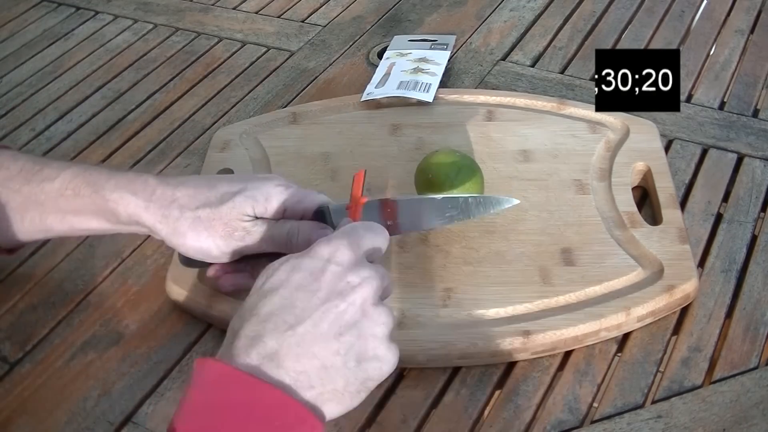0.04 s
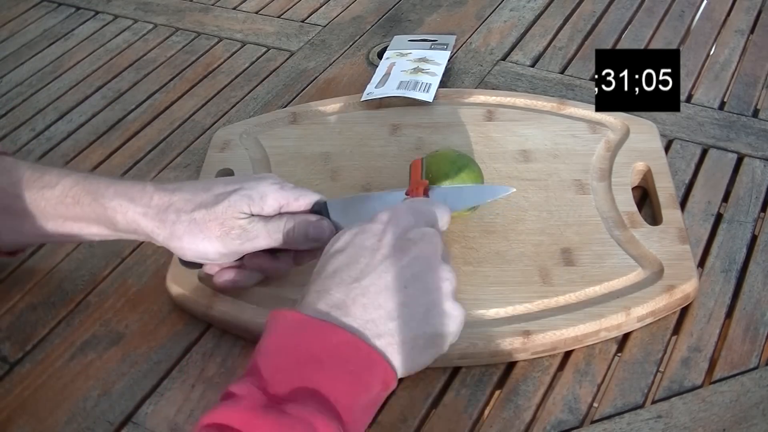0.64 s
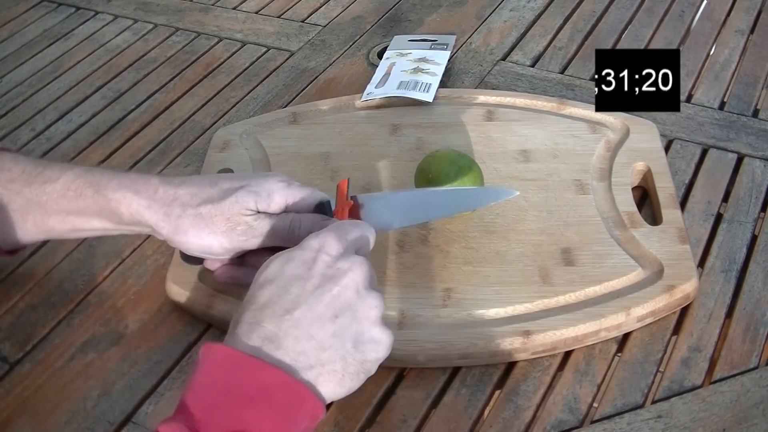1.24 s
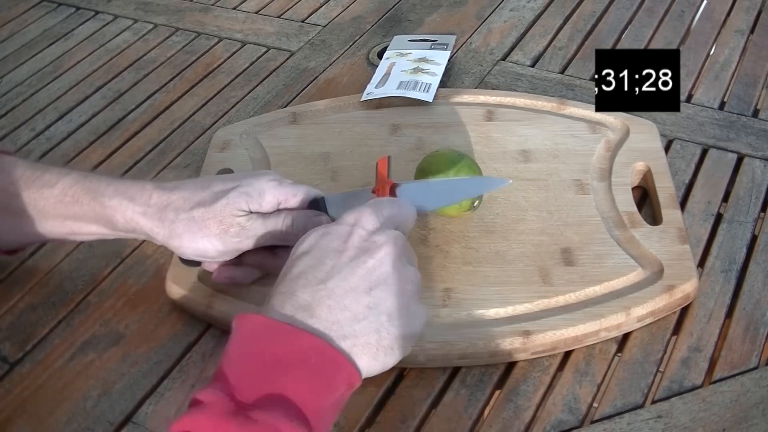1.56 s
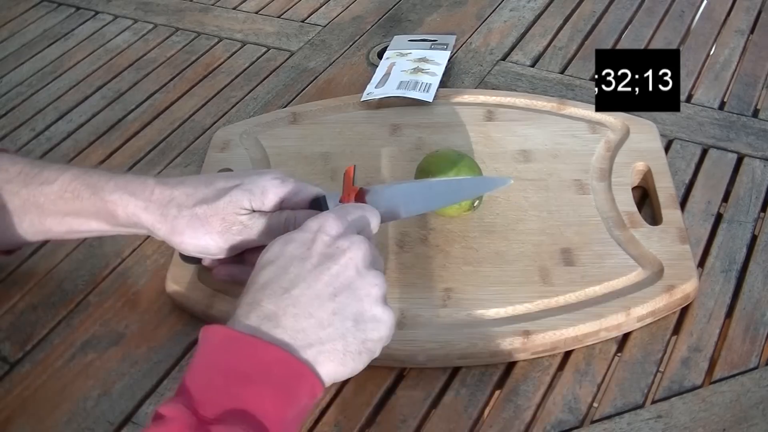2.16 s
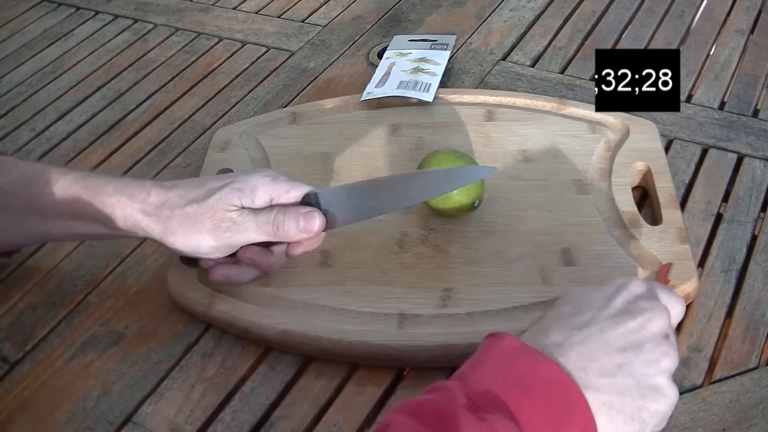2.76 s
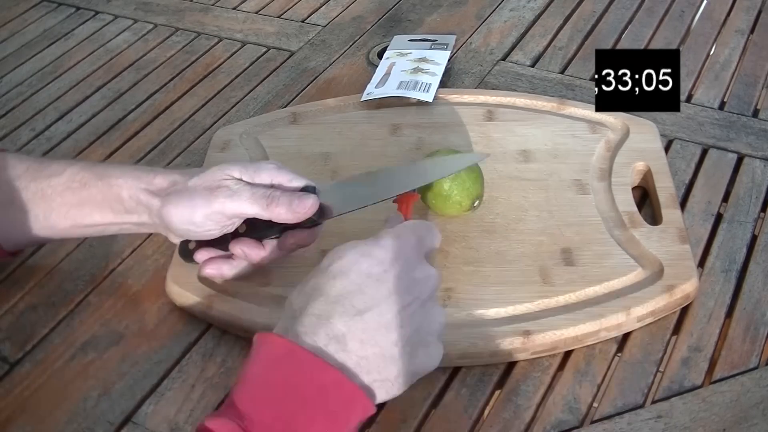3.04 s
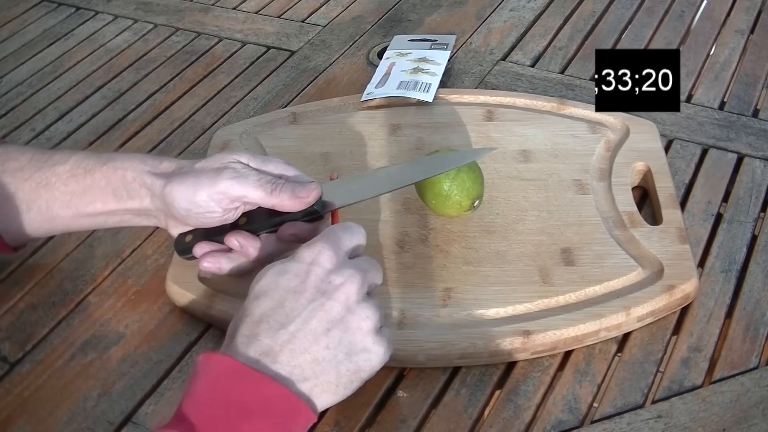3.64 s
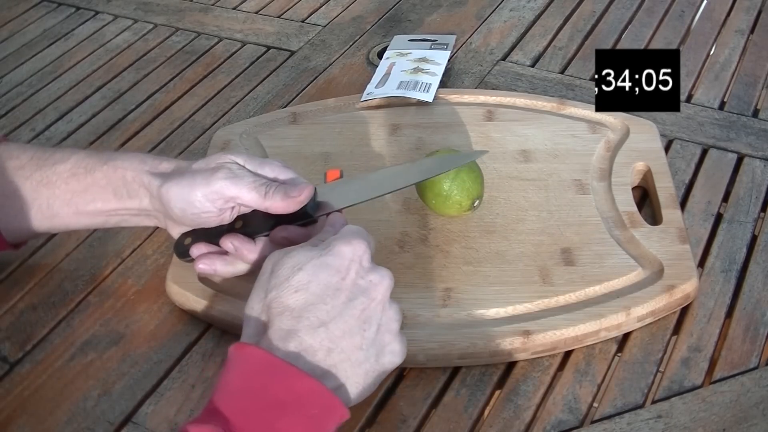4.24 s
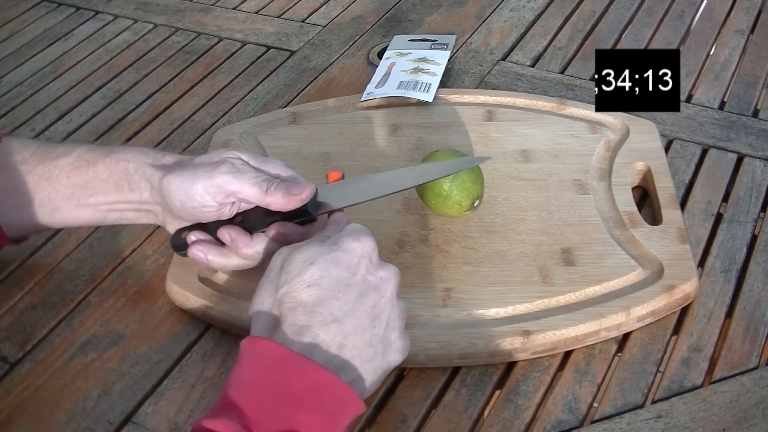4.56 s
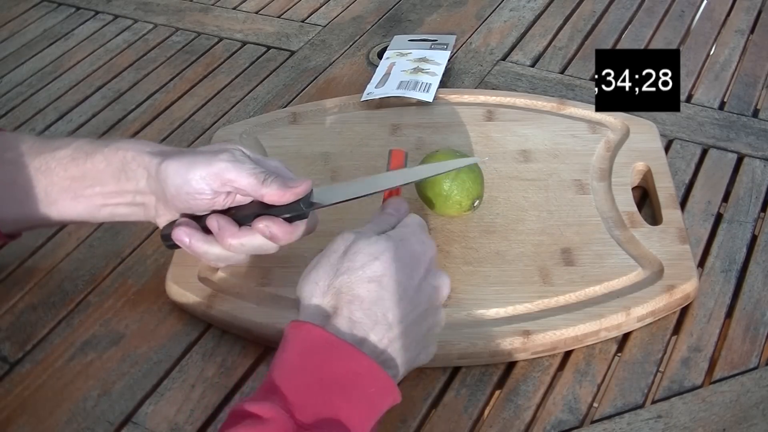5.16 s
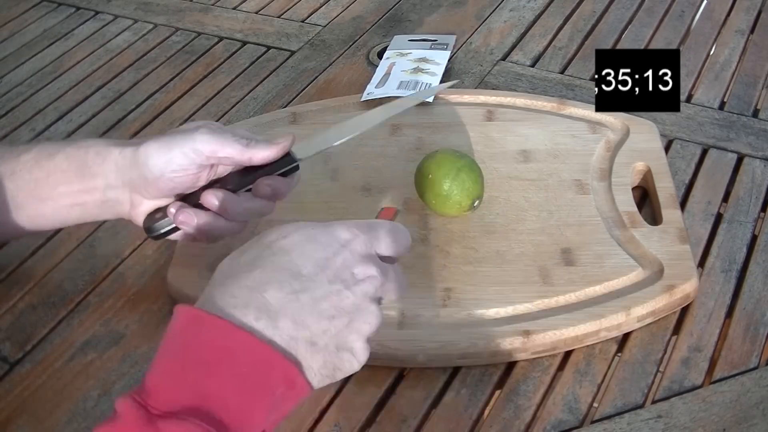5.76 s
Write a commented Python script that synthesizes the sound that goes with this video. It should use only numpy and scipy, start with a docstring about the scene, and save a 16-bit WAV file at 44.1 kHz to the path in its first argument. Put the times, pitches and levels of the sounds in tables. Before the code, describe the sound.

Close up, a handheld sharpener clicks onto a kitchen knife, scrapes along the steel with a brightening rasp and slips off the tip with a snap and a soft low knock. This happens three times in a steady rhythm, then, after a lone click and a lull, once more near the end. The setting is a quiet garden, with a soft hush, slight echo and a barely audible faraway bird.

```python
"""A garden table, two microphone ports close to a steel kitchen knife drawn four times through a small
hand-held sharpener. The jaws click onto the heel and rub into their seat, ringing the blade; tiny slips
of steel rasp faster and faster along the edge until the jaws snap off the tip. A soft low knock and hum
follow each pull. Furniture and a nearby wall echo faintly; behind lie quiet air and a far bird."""
import sys
import numpy as np
from scipy import signal
from scipy.fft import rfft, irfft
from scipy.io import wavfile

SR = 44100
rng = np.random.default_rng(int(sys.argv[2]) if len(sys.argv) > 2 else 0)


def digitize_waveform(pressure):
    """Quantize a signal to 16-bit integers and store it at the path in sys.argv[1].

    Rows of a 2-D input are taken as channels; values are limited to [-1, 1].
    """
    field = np.atleast_2d(pressure).T
    bounded = np.clip(field, -1, 1)
    quanta = np.round(bounded * 32767).astype(np.int16)
    wavfile.write(sys.argv[1], SR, quanta)


N = 264600
TIME = np.arange(N) / SR

# spectrum of the outdoor hush: f/Hz, level/dB
AIR_SPECTRUM = [(20, -42), (38, -13), (54, -4.5), (85, -15), (125, -4.5), (210, 0), (400, -3), (600, -10),
                (1000, -9), (2500, -8), (4600, -7), (5600, -11.5), (13000, -18), (16000, -25.5)]
# modes of the blade gripped in the jaws: f/Hz, t60/s, level/dB
BLADE_MODES = [(1905, 0.024, -19.5), (2410, 0.0026, -40), (2810, 0.014, -4), (3125, 0.011, -3),
               (4385, 0.017, 7), (4522, 0.022, -3), (5450, 0.017, -15), (7110, 0.015, -7),
               (7140, 0.019, -28), (9890, .014, -8.5), (12100, 0.014, -24)]
# jaws knocking or catching on the blade: t/s, ring peak/dB, main ring/Hz, low-mode boost/dB
JAW_CLICKS = [(0.292, -31, 4450, 14), (0.3303, -13.5, 4096, 5.5), (0.5118, -27, 4470, 12),
              (0.6596, -22, 4540, 12), (1.2449, -6.5, 4230, -1.5), (1.477, -33.5, 4250, 12),
              (1.5268, -22.5, 4310, 9.5), (1.6913, -25.5, 4100, -1), (2.2219, -13.5, 4350, 4),
              (2.3476, -14.5, 4100, 7.5), (2.441, -35.5, 4000, 12), (2.5009, -22.5, 4130, 5),
              (2.5187, -16, 4170, 6), (3.4461, -16.5, 4390, 9), (3.8613, -40.5, 4300, 0),
              (4.9918, -39.5, 4570, -9), (5.0921, -32, 4260, 11), (5.2039, -23, 4550, 15),
              (5.2733, -20.5, 4550, 9), (5.3088, -18, 4490, 6)]
# spectrum of the crack in a click or snap: f/Hz, level/dB
CRACK_SPECTRUM = [(60, -62), (250, -31.5), (650, -32), (1200, -29.5), (1850, -11.5), (2600, -8.5),
                  (3700, -10.5), (4600, 2), (5800, -9), (6800, -6.5), (9000, -15.5), (10400, -15),
                  (12500, -30.5), (16000, -26)]
# jaws seating at the heel: t/s, length/s, level halfway/dB, swell from start to end/dB, main ring/Hz
HEEL_RUBS = [(0.33, .045, -56, -11, 4200), (0.451, .07, -41.5, 9.5, 4360), (1.271, .052, -45, 3, 4200),
             (1.517, 0.055, -43.5, 3, 4220), (2.276, 0.023, -41.5, 2, 4240), (2.33, 0.0058, -41, -4, 4240),
             (2.349, 0.014, -32.5, -5.5, 4100), (2.471, 0.091, -40, 3.5, 4240),
             (5.043, 0.034, -46.5, -15, 4370), (5.106, 0.014, -48, 8, 4440)]
# spectrum of the jaws rasping on steel: f/Hz, level/dB
RASP_SPECTRUM = [(200, -47.5), (400, -18), (620, -40.5), (1000, -17.5), (1550, -16.5), (2300, -4.5),
                 (3200, -5.5), (3800, -9), (4560, 1.5), (5800, -24), (7300, -11), (9200, -20),
                 (10000, -19.5), (16000, -39.5)]
# the rasp with the blade tilted, ringing lower: f/Hz, level/dB
TILTED_SPECTRUM = [(200, -59), (620, -41), (1000, -15.5), (1900, -11.5), (2900, 7.5), (3850, -10.5),
                   (4680, 0), (5600, -20), (6600, -6.5), (8400, -4), (9300, -10), (10200, -10),
                   (12500, -17), (16000, -25)]
# pulls from heel to tip: t/s, bite time/s, t at the blade's curve/s, straight-edge level/dB,
# dip at the curve/dB, tip level/dB, speed-up exponent, coarse grinding/dB, bright hiss/dB
EDGE_PULLS = [(.579, 0.081, .742, -34.5, 7, -20, 1.6, -5, -13),
              (1.586, 0.018, 1.668, -42, 3, -24, 1.74, -3.5, -13),
              (2.621, 0.043, 2.702, -29, 2, -20.5, 1.6, -5.5, -10),
              (5.175, 0.035, 5.287, -35, 16, -24, 1.35, 1.5, -9)]
# the blade's free end singing upward: t/s, starting f/Hz, rise/octaves, level/dB
BLADE_ZIPS = [(.756, 5300, 0.5, -39.5), (1.735, 5960, 0.77, -37.5), (1.76, 4000, 0.34, -33),
              (2.518, 5830, 0.23, -43), (2.684, 5360, .68, -34.5), (2.709, 3110, 0.91, -29)]
# jaws leaving the tip, one row a pull: t/s, level/dB, length/s, ring/Hz, holder/dB
TIP_SNAPS = [(0.84, -20, 0.0022, 4840, -25), (1.809, -20, 0.0026, 4380, -18),
             (2.7616, -19.5, 0.0035, 4534, -15), (5.3588, -25.5, 0.00057, 2980, -25)]
# the soft knock after each snap: thud/dB, upper hum/dB, lower hum/dB
KNOCK_LEVELS = [(-63, -71, -60), (-45.5, -53, -63), (-41, -47.5, -52.5), (-59.5, -62.5, -64.5)]
# modes of that knock: f/Hz, t60/s, level/dB
THUD_MODES = [(388, 0.062, 9.5), (357, 0.11, 0), (235, 0.35, -3.5), (199.5, 0.57, -5), (48.7, 1, -21)]
# far bird calls: t/s, starting f/Hz, level/dB
BIRD_CALLS = [(1.17, 5270, -60.5), (3.91, 4750, -64), (4.21, 4230, -62), (4.63, 5400, -65),
              (4.75, 5300, -59.5), (5.91, 4220, -62)]
# balance of the microphone ports: f/Hz, left minus right/dB
PORT_BALANCE = [(2000, -0.5), (2800, -0.5), (3400, -5.5), (4200, -2.5), (5500, -3.5), (6300, 5), (7100, 4),
                (8100, -1.5), (9000, 4.5), (9900, -9.5), (11500, -6), (15000, -2)]
# share of the sound that is unalike at the two ports: f/Hz, level/dB
PORT_SPREAD = [(1500, -40), (4500, -29), (5900, -7), (8000, -11), (10200, -3.5), (13000, -3.5)]
# phase by which the left port leads: f/Hz, lead/rad
PORT_LEAD = [(0, 0), (5000, 0), (5900, .7), (7500, -.45), (8800, -.4), (9500, -1.8), (10700, -1.2),
             (12200, .6), (14000, 2.4), (16000, 2.4)]


def amp(db):
    """Decibels to gain."""
    return 10 ** (np.asarray(db) / 20)


def unit(x):
    """Scale to rms 1."""
    return x / np.sqrt(np.mean(x ** 2))


def colour(x, points, size=4096):
    """Causal filter through points of f/Hz, level/dB."""
    hz, db = np.transpose(points)
    grid = np.maximum(np.fft.rfftfreq(size, 1 / SR), 1)
    cepstrum = irfft(np.log(amp(np.interp(np.log(grid), np.log(hz), db))))
    cepstrum[1:size // 2] *= 2
    cepstrum[size // 2 + 1:] = 0
    return signal.fftconvolve(x, irfft(np.exp(rfft(cepstrum))))[:len(x)]


def band(x, lo_hz, hi_hz, order=3):
    """Band-pass."""
    return signal.sosfilt(signal.butter(order, [lo_hz, hi_hz], "band", fs=SR, output="sos"), x)


def walk(rate_hz):
    """Smooth random wander with spread near 1."""
    steps = np.arange(0, N / SR + 1, 1 / rate_hz)
    return np.interp(TIME, steps, rng.standard_normal(len(steps)))


def ramp(start_s, length_s):
    """Straight rise from 0 to 1."""
    return np.clip((TIME - start_s) / length_s, 0, 1)


def fade(t, t60):
    """Exponential decay."""
    return np.exp(-np.log(1000) * t / t60)


def ring(modes, length_s):
    """Damped modes after one blow."""
    t = TIME[:int(length_s * SR)]
    return sum(amp(db) * fade(t, t60) * np.sin(2 * np.pi * hz * t) for hz, t60, db in modes)


def add(out, s, x):
    """Mix x in at time s."""
    i = int(s * SR)
    out[i:i + len(x)] += x[:N - i]


def glides(rows, length_s, blur_hz, steady=0):
    """Rising or falling whistles, blurred into a narrow band."""
    out, n = np.zeros(N), int(length_s * SR)
    blur = (steady + walk(blur_hz) + 1j * walk(blur_hz)) / np.hypot(1, steady)
    for s, start_hz, octaves, db in rows:
        phase = 2 * np.pi * np.cumsum(start_hz * 2 ** np.linspace(0, octaves, n)) / SR
        whistle = np.real(np.roll(blur, -int(s * SR))[:n] * np.exp(1j * phase))
        add(out, s, amp(db) * np.sqrt(np.hanning(n)) * whistle)
    return out


def air(hush_db=-60, whine_db=-72, whine_hz=7812):
    """Quiet outdoor hush all round, alike at both ports in the bass, with a thin wavering whine."""
    mid = unit(colour(rng.standard_normal(N), AIR_SPECTRUM)) * amp(.5 * walk(3.4))
    side = unit(colour(rng.standard_normal(N), AIR_SPECTRUM))
    side = colour(side, [(60, -10.5), (280, -2.5), (900, -9), (3000, -5), (7000, -2.0), (15000, -1.5)])
    whine = amp(whine_db) * walk(200) * np.sin(2 * np.pi * whine_hz * TIME)
    return amp(hush_db) * np.array([mid + side, mid - side]) + whine


def gripped_modes(ring_hz, centre_hz=4330, width_hz=180):
    """The blade's modes; those near the main ring shift with where the jaws hold it."""
    return [(hz + (ring_hz - centre_hz) * np.exp(-((hz - centre_hz) / width_hz) ** 2), t60, db)
            for hz, t60, db in BLADE_MODES]


def struck_blade(modes, t, free_db=-45, free_t60=0.102):
    """Modes die fast under the jaws' grip and leave a thin free ring."""
    return sum(amp(db) * (fade(t, t60) + amp(free_db) * fade(t, free_t60)) * np.sin(2 * np.pi * hz * t)
               for hz, t60, db in modes)


def jaw_clicks(crack_db=-9, crack_t60=0.012, rise_s=0.00063, low_below_hz=3700):
    """Each knock of the jaws cracks and rings the blade, at a pitch set by where they hold it."""
    out, t = np.zeros(N), TIME[:int(.2 * SR)]
    for s, peak_db, ring_hz, low_db in JAW_CLICKS:
        modes = [(hz, t60, db + (hz < low_below_hz) * low_db) for hz, t60, db in gripped_modes(ring_hz)]
        steel = unit(struck_blade(modes, t) * (1 - np.exp(-t / rise_s)))
        crack = unit(colour(rng.choice([-1, 1], len(t)) * fade(t, crack_t60), CRACK_SPECTRUM))
        add(out, s, amp(peak_db) * (steel + amp(crack_db) * crack) / np.abs(steel).max())
    return out


def grit(slips_per_s, scatter_db, chatter_hz, chatter_db, nicks_per_s=70, nick_db=14):
    """Tiny slips of steel, bunched by the hand-held tool's chatter, with harder catches on nicks."""
    slips = (rng.random(N) < slips_per_s / SR) * rng.choice([-1, 1], N)
    sizes = amp(scatter_db * np.clip(rng.standard_normal(N), -2, 2))
    catches = amp(nick_db) * (rng.random(N) < nicks_per_s / SR)
    chatter = amp(chatter_db * np.clip(walk(chatter_hz), -2, 2))
    return slips * sizes * chatter + catches


def heel_rubs(tilt_db_per_octave=-1, pivot_hz=4330, rasp_db=-7, attack_s=.005, release_t60=0.052):
    """Slow slips at the heel ring the blade's modes over a little broad rasp."""
    slips = grit(slips_per_s=4500, scatter_db=3.0, chatter_hz=254.4, chatter_db=3.5)
    rasp, out = unit(colour(slips, RASP_SPECTRUM)), 0
    for s, length, level_db, swell_db, ring_hz in HEEL_RUBS:
        # a light grip lets the blade ring longer
        modes = [(hz, t60 * 1.2, db + tilt_db_per_octave * np.log2(hz / pivot_hz))
                 for hz, t60, db in gripped_modes(ring_hz)]
        ringing = signal.oaconvolve(slips, ring(modes, .05))[:N]
        steel = unit(band(ringing, 2300, 14800, order=2))
        contact = ramp(s - attack_s / 2, attack_s) * fade(np.maximum(TIME - s - length, 0), release_t60)
        gain = amp(level_db + swell_db * (ramp(s, length) - .5))
        out += contact * gain * (steel + amp(rasp_db) * rasp)
    return out


def edge_pulls(core_db=2, contact_s=0.0017, bite_db=12.5, dip_s=0.012, brighten_db=8.5, tilted_s=4.5):
    """Dense slips: the jaws bite, ease where the blade curves, then speed up and brighten to the tip."""
    slips = grit(slips_per_s=8000, scatter_db=3.5, chatter_hz=299.6, chatter_db=2.5)
    bands_hz = [(280, 3700), (3700, 5500), (5500, 17000)]
    upright, tilted = ([unit(band(colour(slips, spectrum), lo, hi)) for lo, hi in bands_hz]
                       for spectrum in (RASP_SPECTRUM, TILTED_SPECTRUM))
    out = 0
    for pull, (end_s, *_) in zip(EDGE_PULLS, TIP_SNAPS):
        s, bite_s, curve_s, edge_db, dip_db, tip_db, power, coarse_db, hiss_db = pull
        coarse, core, hiss = tilted if s > tilted_s else upright
        speed = ramp(curve_s, end_s - curve_s) ** power
        slack_db = bite_db * (1 - ramp(s, bite_s)) + dip_db * np.exp(-((TIME - curve_s) / dip_s) ** 2)
        contact = ramp(s - contact_s / 2, contact_s) - ramp(end_s, contact_s)
        shift_db = brighten_db * speed
        rasp = amp(core_db) * core + amp(coarse_db - shift_db) * coarse + amp(hiss_db + shift_db) * hiss
        out += contact * amp(edge_db + (tip_db - edge_db) * speed - slack_db) * rasp
    return out


def blade_zips():
    """The free end of the blade sings upward as the jaws shorten it."""
    return glides(BLADE_ZIPS, length_s=.028, blur_hz=419, steady=1.5)


def tip_snaps(tip_db=-5, tip_t60=0.0035, tear_t60=0.0091, holder_hz=1880, holder_t60=0.0081):
    """The jaws tear over the tip in a burst of a few milliseconds that jolts the plastic holder."""
    out, t = np.zeros(N), TIME[:int(.03 * SR)]
    for s, db, length, tip_hz, holder_db in TIP_SNAPS:
        tear = rng.choice([-1, 1], len(t)) * fade(np.maximum(t - length, 0), tear_t60)
        crack = unit(colour(tear, CRACK_SPECTRUM))
        swell = np.sin(np.pi / 2 * np.minimum(t / length, 1)) ** 3
        tip = unit(swell * fade(t, tip_t60) * np.sin(2 * np.pi * tip_hz * t))
        holder = unit(swell * fade(t, holder_t60) * np.sin(2 * np.pi * holder_hz * t))
        add(out, s, amp(db) * unit(crack + amp(tip_db) * tip + amp(holder_db) * holder))
    return out


def low_knocks(lag_s=0.029, upper_hz=182.7, lower_hz=121.5, waver_db=2, waver_hz=24.97):
    """A padded knock just after each snap, then two low modes swell and hum on, wavering."""
    out = np.zeros(N)
    for (s, *_), (thud_db, upper_db, lower_db) in zip(TIP_SNAPS, KNOCK_LEVELS):
        thud = ring([(hz, t60, db + thud_db) for hz, t60, db in THUD_MODES], length_s=2)
        upper = ring([(upper_hz, 1.2, upper_db)], length_s=1.8)
        lower = ring([(lower_hz, 1.8, lower_db)], length_s=2)
        for sound, rise_s in (thud, 0.0069), (upper, 0.014), (lower, 0.1):
            add(out, s + lag_s, sound * (1 - np.exp(-TIME[:len(sound)] / rise_s)))
    return out * amp(waver_db * walk(waver_hz))


def far_bird(octaves=-0.22):
    """Far from the microphone a bird repeats one falling call, smeared by the distance."""
    return glides([(s, hz, octaves, db) for s, hz, db in BIRD_CALLS], length_s=0.1, blur_hz=795)


def microphone_ports(x, flutter_hz=700):
    """Two close ports: the right hears a little more; the treble reaches them out of step and unalike."""
    side = colour(x * walk(flutter_hz), PORT_SPREAD)
    hz = np.fft.rfftfreq(N, 1 / SR)
    balance_db, lead = (np.interp(hz, *np.transpose(points)) for points in (PORT_BALANCE, PORT_LEAD))
    leftward = amp(balance_db / 2) * np.exp(.5j * lead)
    return irfft([rfft(x + side) * leftward, rfft(x - side) / leftward], N)


def garden_echoes(x, delay_s=0.0046, t60=0.24, wall_s=0.046, wall_width_s=0.0032, echoes_per_s=3500):
    """Scattered echoes from furniture and a nearby wall, different at each port."""
    t = TIME[:SR // 2]
    wall = 0.69 * np.exp(-((t - wall_s) / wall_width_s) ** 2)
    envelope = (t > delay_s) * fade(t, t60) * (1 + wall)
    reflected = colour(x, [(200, -6.0), (1100, -2.5), (2200, 6.5), (4500, 2.5),
                           (6800, 3), (8500, -4.5), (11000, 0.0), (16000, -10)])
    tails = rng.standard_normal((2, len(t))) * (rng.random((2, len(t))) < echoes_per_s / SR) * envelope
    return np.array([signal.fftconvolve(reflected, tail / np.linalg.norm(tail))[:N] for tail in tails])


def scene():
    """Knife and sharpener close to the microphone, the garden around them."""
    near = heel_rubs() + edge_pulls() + blade_zips() + jaw_clicks() + tip_snaps() + low_knocks()
    return microphone_ports(near) + amp(-17.5) * garden_echoes(near) + far_bird() + air()


def record(dry):
    """The recorder stops at full scale and cuts the top above 15850 Hz."""
    low_pass = signal.ellip(10, .2, 70, 15850, fs=SR, output="sos")
    return signal.sosfilt(low_pass, np.clip(dry, -1, 1))


dry = scene()
out = record(dry)
digitize_waveform(out)
```